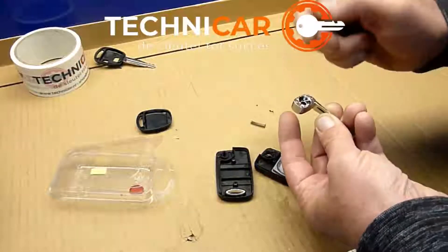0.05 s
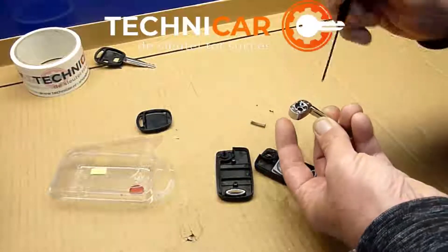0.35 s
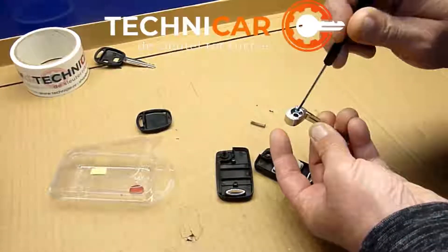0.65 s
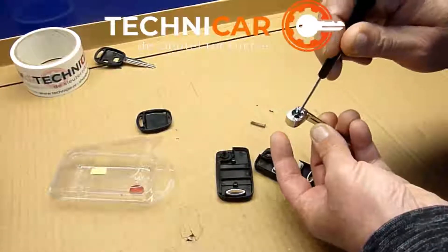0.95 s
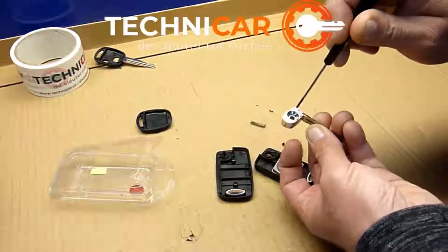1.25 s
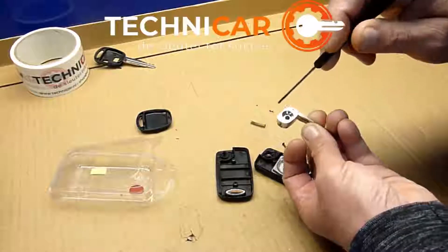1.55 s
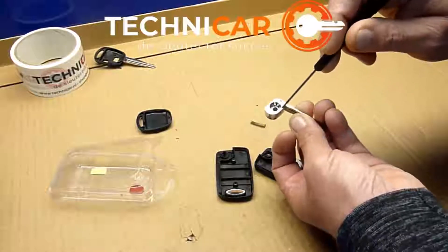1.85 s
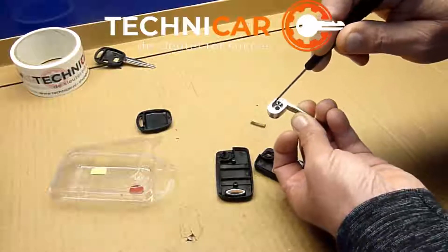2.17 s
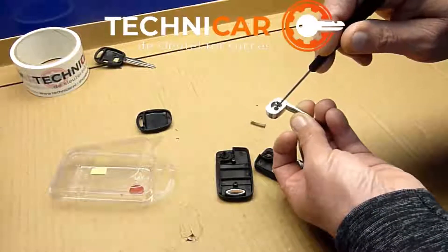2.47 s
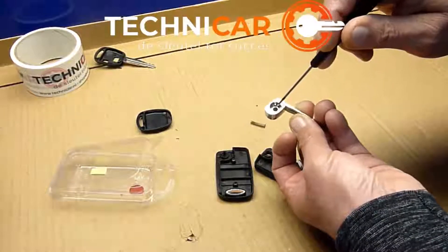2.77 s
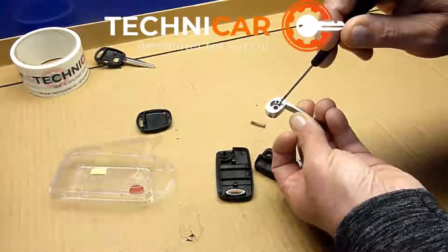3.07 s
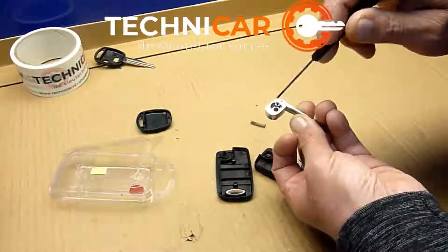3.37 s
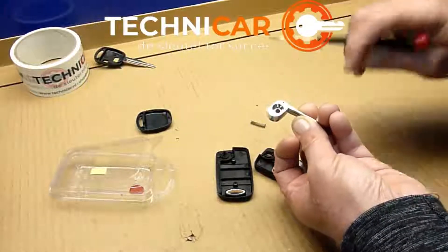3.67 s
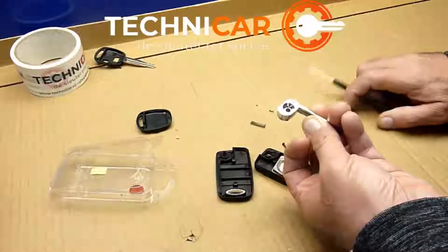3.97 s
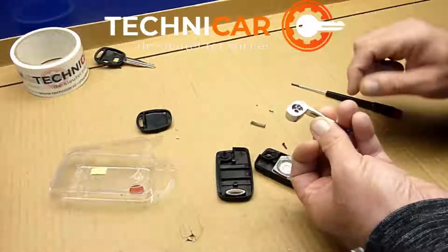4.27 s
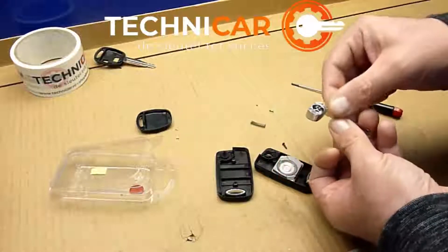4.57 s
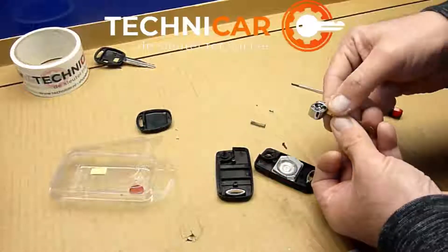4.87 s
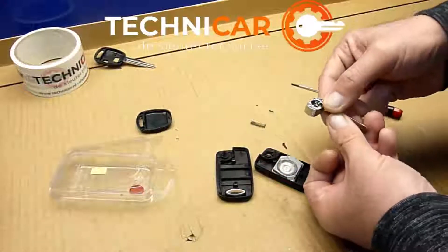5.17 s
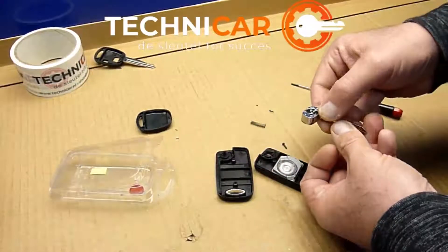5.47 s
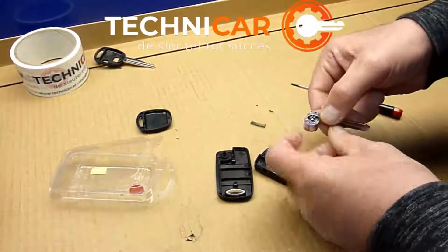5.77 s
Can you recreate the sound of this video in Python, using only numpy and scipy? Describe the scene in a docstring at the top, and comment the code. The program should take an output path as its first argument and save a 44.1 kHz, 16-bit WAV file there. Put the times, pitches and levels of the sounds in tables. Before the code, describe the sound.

Quiet room noise and a low hum run throughout, in a small room heard up close. Fingers rub softly on a tool at the very start. From about 0.7 to 0.9 seconds, a thin screwdriver tip makes five quick, bright clicks and a light scrape on a metal key head, each with a tiny, damped ring. Fainter ticks and a slight scratch follow around 1.9 to 2.2 seconds, then single ticks at 2.5, 2.9 and 3 seconds, slightly to the right. Fingers shift softly around 3.5 seconds. From 3.8 to 4.3 seconds the screwdriver is laid on the workbench and bounces in a rapid clatter of hollow knocks and steel slaps, by far the loudest sound, peaking at 4 seconds and dulling as it settles. A very faint electrical buzz comes briefly near 1, 3 and 5 seconds, and a faint thin whine pulses from 1.7 to 4.5 seconds.

```python
"""A thin screwdriver picks at the metal head of a flip key, over a workbench in a small room.
Its tip scrapes and ticks in the socket, making the head ring, while fingers rub on tool and key.
Then the tool is laid down: handle and steel end bounce to rest, and shaft and bench top ring.
Under it lie quiet room noise, a low hum and faint electrical interference that switches on and off."""
import sys
import numpy as np
from scipy import signal
from scipy.fft import rfft, irfft
from scipy.io import wavfile
from scipy.ndimage import uniform_filter1d

SR = 44100
rng = np.random.default_rng(int(sys.argv[2]) if len(sys.argv) > 2 else 0)


def wav_record(signal):
    """Record a signal, one row per channel, as 16-bit PCM in the file named by sys.argv[1]."""
    frames = np.transpose(np.atleast_2d(signal))
    bounded = np.clip(frames, -1, 1)
    # unit amplitude maps onto the largest positive 16-bit level
    quanta = np.round(bounded * 32767).astype(np.int16)
    wavfile.write(sys.argv[1], SR, quanta)


N = 256652
TIME = np.arange(N) / SR
EVENT_TIME = TIME[:SR // 3]  # seconds since the start of one tick, knock or scrape
FREQS = np.fft.rfftfreq(N, 1 / SR)

# How alike scattered sound is on the left and right (1 = the same): pitch_hz, likeness
STEREO_LIKENESS = [(100, 1), (600, 0.99), (1500, 0.98), (3200, 0.78), (7000, 0.4), (14000, 0.17)]


def amp(db):
    """Turns decibels into a gain to multiply by."""
    return 10 ** (np.asarray(db) / 20)


def unit_level(x):
    """Scales a signal to an average (rms) level of 1."""
    return x / np.sqrt(np.mean(x ** 2) + 1e-20)


def value_at(table, hz):
    """Reads between the rows of a table, with every octave equally wide."""
    pitches, values = np.transpose(table)
    return np.interp(np.log(hz + 1), np.log(pitches + 1), values)


def add(mix, start_s, sound):
    """Adds a sound to the mix at the given time."""
    part = mix[:, round(start_s * SR):][:, :sound.shape[-1]]
    part += sound[..., :part.shape[-1]]


def fade(t, fade_s):
    """Dies away by 60 dB in fade_s; any value below 1 ms counts as 1 ms."""
    return np.exp(-np.log(1000) * t / np.maximum(fade_s, 1e-3))


def colour(x, tone, tilt_db=0, peak_hz=0, peak_db=0, width_hz=260, size=2048):
    """Filters a sound by a tone table, a tilt per octave (plus is brighter) and one ringing peak."""
    hz = np.fft.rfftfreq(size, 1 / SR)
    db = value_at(tone, hz) + tilt_db * np.log2(np.maximum(hz, 500) / 5000)
    peak = abs(1 + (amp(peak_db) - 1) / (1 + 2j * (hz - peak_hz) / width_hz))
    gain = amp(db) * peak
    log_gain = np.log(np.r_[gain, gain[-2:0:-1]])
    taps = np.fft.ifft(np.exp(np.conj(signal.hilbert(log_gain)))).real  # rings only after a hit
    return signal.fftconvolve(x, taps[None], axes=1)[:, :x.shape[1]]


def stereo_noise(size, likeness=STEREO_LIKENESS):
    """White noise whose left and right are alike in the bass and less so in the treble."""
    same = np.clip(value_at(likeness, np.fft.rfftfreq(size, 1 / SR)), -.99, .99)
    mid, side = rfft(rng.standard_normal((2, size))) * np.sqrt([(1 + same) / 2, (1 - same) / 2])
    return irfft(np.array([mid + side, mid - side]), size)


def narrow_noise(hz, width_hz):
    """Noise in one narrow band of pitches."""
    band = np.exp(-((FREQS - hz) / width_hz) ** 2)
    return unit_level(irfft(rfft(rng.standard_normal(N)) * band, N))


def ring(notes, spread_db, detune):
    """A struck object rings at its own notes; each blow can shift their balance and pitch."""
    out = 0
    for hz, db, fade_s in notes:
        strength, shift, skew = rng.standard_normal(3)
        # high notes reach left and right out of step
        lag = np.arccos(np.clip(value_at(STEREO_LIKENESS, hz), -1, 1)) * skew * np.array([[.5], [-.5]])
        wave = np.sin(2 * np.pi * hz * (1 + detune * shift) * EVENT_TIME + lag)
        out = out + amp(db + spread_db * strength) * fade(EVENT_TIME, fade_s) * wave
    return out


def contact(chatter_db, chatter_s, touch_s, echo_s, echo_gain):
    """One hit: a brief push, its echo off the bench top, and a burst of chatter and near echoes."""
    burst = stereo_noise(len(EVENT_TIME)) * fade(EVENT_TIME, chatter_s)
    chatter = amp(chatter_db) * burst / np.sqrt(np.sum(burst ** 2) / 2)
    blow = np.zeros_like(burst)
    blow[:, 0] = -1
    delay = round(echo_s * SR)
    blow[[0, 1], [delay + 1, delay]] -= echo_gain  # the echo reaches the right side first
    push = np.exp(-((EVENT_TIME[:9] - EVENT_TIME[4]) / touch_s) ** 2)
    return signal.lfilter(push / push.sum(), [1], blow) + chatter


def friction(strokes, tone, grain_db):
    """Surfaces rub: each stroke is a swell of tiny slips of uneven size."""
    out = np.zeros((2, N))
    for start_s, rise_s, fade_s, db in strokes:
        roughness = unit_level(uniform_filter1d(rng.standard_normal(len(EVENT_TIME)), size=40))
        slips = unit_level(amp(grain_db * roughness))
        rise = np.sqrt(np.minimum(EVENT_TIME / rise_s, 1))
        swell = rise * fade(np.maximum(EVENT_TIME - rise_s, 0), fade_s)
        add(out, start_s, amp(db) * colour(stereo_noise(len(EVENT_TIME)) * slips * swell, tone))
    return out


def air(level_db=-58):
    """Room rumble and microphone hiss."""
    # Tone of the noise: pitch_hz, gain_db
    tone = [(15, -37), (25, -6), (58, 0.5), (84, -12.5), (99, -5), (120, -4), (153, -7), (270, -7.5),
            (301, -9), (439, -9.5), (796, -13), (1100, -14), (2350, -18.5), (14400, -28), (16000, -30.5)]
    # How alike its left and right are: pitch_hz, likeness
    likeness = [(60, 0.94), (130, 0.85), (290, 0.72), (640, 0.6), (1410, 0.0049), (3100, -0.063),
                (6820, -0.14), (15000, 0.4)]
    spectrum = rfft(stereo_noise(N, likeness)) * amp(value_at(tone, FREQS))
    return amp(level_db) * unit_level(irfft(spectrum, N))


def hum(waver_hz=1.22, waver_radians=.4):
    """Low steady tones whose pitch wavers slowly."""
    # Tones of the hum: pitch_hz, level_db
    tones = [(48.4, -74.5), (118.4, -73), (183.0, -73.5), (274.5, -77)]
    out = 0
    for hz, db in tones:
        drift = waver_radians * narrow_noise(0, waver_hz)
        out = out + amp(db) * np.sqrt(2) * np.sin(2 * np.pi * hz * TIME + drift)
    return out


def buzz(pitch_hz=362.3, hiss_db=-75, switch_s=.0051):
    """A faint electrical buzz with a sizzling top, switching on and off."""
    # When it sounds: on_s, off_s
    spans = [(.96, 1.33), (3.04, 3.41), (5.12, 5.46)]
    # Its tones at 1, 2, 3 ... times the pitch: level_db
    harmonics = [-70.5, -71.5, -76, -73, -89, -78, -79.5, -84, -84.5, -89, -87]
    # Its high, fuzzy bands: pitch_hz, level_db
    bands = [(11700, -87), (14250, -84), (14650, -85), (15500, -84)]
    gate = sum(np.clip(np.minimum(TIME - on, off - TIME) / switch_s, 0, 1) for on, off in spans)
    tone = sum(amp(db) * np.sqrt(2) * np.sin(2 * np.pi * (k * pitch_hz * TIME + rng.random()))
               for k, db in enumerate(harmonics, 1))
    sizzle = sum(amp(db) * narrow_noise(hz, width_hz=150) for hz, db in bands)
    return gate * (tone + sizzle + amp(hiss_db) * rng.standard_normal(N))


def whine(pitch_hz=3187, right_db=-69, on_s=1.74, off_s=4.47, every_s=.16, burst_s=.04):
    """A thin interference whine in short, evenly spaced bursts."""
    gate = (TIME > on_s) & (TIME < off_s) & ((TIME - on_s) % every_s < burst_s)
    soft_gate = uniform_filter1d(gate.astype(float), size=150)
    tone = np.sqrt(2) * soft_gate * np.sin(2 * np.pi * pitch_hz * TIME)
    return amp(right_db) * tone * np.array([[-.4], [1]])  # weaker and upside down on the left


def room(x, echo_db, build_s):
    """Adds the room's wash of echoes, which builds up briefly and dies sooner in the treble."""
    # How long the room rings: pitch_hz, fade_s
    fade_times = [(150, 0.43), (600, 0.24), (2000, 0.24), (5000, 0.21), (10000, 0.12), (16000, 0.068)]
    hz, t, bands = signal.stft(stereo_noise(SR), SR, nperseg=256)
    tail = signal.istft(bands * fade(t, value_at(fade_times, hz)[:, None]), SR)[1]
    tail *= np.minimum(TIME[:tail.shape[1]] / build_s, 1) ** 2
    tail /= np.linalg.norm(tail[0])
    return x + amp(echo_db) * signal.fftconvolve(x, tail, axes=1)[:, :N]


def bench_contact(chatter_db):
    """One hit of the tool on the bench top."""
    return contact(chatter_db, chatter_s=.031, touch_s=.000025, echo_s=.00094, echo_gain=.93)


def tool_landing(handle_hz=2000, bench_rise_s=.0025, lowest_hz=122):
    """The screwdriver bounces to rest, duller toward the end; its shaft and the bench top ring."""
    # The handle hits the bench: start_s, level_db, thump_gain_db
    knocks = [(3.8058, -9, 0.5), (3.8258, -10, 6.5), (3.925, -0.5, -1.5), (3.9976, 12.5, 2),
              (4.018, -3.5, -19), (4.035, -9.5, -5), (4.0758, 7, 4), (4.1208, -1, 6.5), (4.1453, -8.5, 14),
              (4.161, -15, 15.5), (4.2724, -33.5, 6)]
    # The steel end slaps down just after it: start_s, level_db, pitch_hz
    slaps = [(3.9266, -24, 7550), (4.0078, -16, 9460), (4.082, -23, 7200)]
    # Tone of a hit on the bench: pitch_hz, gain_db
    hit_tone = [(70, -53), (140, -21.5), (400, -9.5), (900, -4), (1600, -3.5), (2300, -3), (3300, 4),
                (5300, 2), (6700, -4), (8200, -5), (9700, -3), (12000, -10), (15500, -12)]
    # Brightness of the bounces: time_s, tilt_db_per_octave
    brightness = [(3.81, 0.5), (3.925, -0.5), (3.997, 0), (4.17, -4)]
    # The handle slides and rolls: start_s, rise_s, fade_s, level_db
    slides = [(3.82, .018, .2, -40), (4.09, .05, .1, -42)]
    # Tone of that sliding: pitch_hz, gain_db
    slide_tone = [(70, -40), (140, 11.5), (340, 10), (700, -9), (1500, -1.5), (2400, -8), (3100, 8.5),
                  (4200, 2.5), (9500, 6.5), (13000, -2.5), (16000, -9)]
    # Notes of the bench top: pitch_hz, level_db, fade_s
    bench_notes = [(132, -50, .14), (154, -43, .18), (190, -46, .08), (219, -42, .15), (243, -45, .11),
                   (333, -46, .09), (350, -46, .17), (500, -47, .08), (554, -44, .14), (770, -48, .12)]
    # Notes of the steel shaft: pitch_hz, level_db, fade_s
    shaft_notes = [(1266, -46.5, .12), (1520, -38, 0.029), (2090, -43.5, 0.06), (2590, -42.5, .08),
                   (3020, -40.5, .11), (3400, -44.5, 0.055), (4000, -44.5, 0.081), (4600, -47, .1),
                   (5160, -32.5, 0.031), (7260, -34, 0.046), (9680, -37, 0.071), (12100, -49, 0.065)]
    weak_to_hard_db = [.5, 9]
    out = friction(slides, slide_tone, grain_db=3)
    # the bench top takes a moment to move, and an arm resting on it damps it
    bench_swell = (1 - np.exp(-EVENT_TIME / bench_rise_s)) * fade(EVENT_TIME, fade_s=.25)
    for start_s, db, thump_db in knocks:
        tilt_db = np.interp(start_s, *np.transpose(brightness))
        # weak knocks chatter more and bring out the handle's hollow note
        chatter_db = np.interp(db, weak_to_hard_db, [10.5, 3.5])
        hollow_db = np.interp(db, weak_to_hard_db, [4.5, 3])
        crack = bench_contact(chatter_db) / np.hypot(1, amp(chatter_db))
        crack = colour(crack, hit_tone, tilt_db, handle_hz, hollow_db)
        bench = amp(thump_db) * bench_swell * ring(bench_notes, spread_db=2.5, detune=.0031)
        shaft = amp(-8) * ring(shaft_notes, spread_db=7.5, detune=.0052)
        add(out, start_s, amp(db) * (crack + bench + shaft))
    for start_s, db, hz in slaps:
        slap = colour(bench_contact(chatter_db=9), hit_tone, tilt_db=2, peak_hz=hz, peak_db=24)
        shaft = amp(-2) * ring(shaft_notes, spread_db=0, detune=.004)
        add(out, start_s, amp(db) * (slap + shaft))
    # the bench top gives off little sound below its lowest note
    return signal.sosfilt(signal.butter(6, lowest_hz, "high", fs=SR, output="sos"), out)


def head_note(x, boost_db, pitch_hz=2380, width_hz=92):
    """Turns the key head's lowest note up or down in the sound of a touch."""
    note = signal.lfilter(*signal.iirpeak(pitch_hz, pitch_hz / width_hz, fs=SR), x)
    return x + (amp(boost_db) - 1) * note


def tip_picking(chatter_db=4):
    """The tip slips and catches on the key head; fingers quickly damp the small metal part."""
    # The tip strikes the head: start_s, level_db, tilt_db_per_octave, head_note_boost_db
    ticks = [(0.6871, -20.5, 2, 7), (0.7146, -25, 5, 20), (0.7695, -18.5, 1, 0), (0.7982, -18, -0.5, -3),
             (0.8824, -20, 2.5, 13.5), (1.876, -41, -1.5, -5), (2.1425, -32, -0.5, 2), (2.164, -34, 1, -3),
             (2.1953, -36, -3, -1), (2.5203, -26.5, 4.5, 6), (2.8768, -28.5, 1.5, 8),
             (3.0424, -24.5, 0.5, 12.5)]
    # The tip slides in the socket: start_s, rise_s, fade_s, level_db
    scrapes = [(.707, 0.016, -0.08, -46), (.73, 0.027, 0.1, -57), (2.135, 0.042, 0.15, -63.5)]
    # Tone of the tip on the head: pitch_hz, gain_db
    tip_tone = [(200, 6), (800, -18), (1300, 4), (1800, -3), (2400, 6), (3100, 0), (3900, 4.5), (5500, 3),
                (6600, 5.5), (9500, 4.5), (12500, 6.5), (14800, 1), (16000, -15)]
    # Notes of the key head: pitch_hz, level_db, fade_s
    key_notes = [(2379, -32, .036), (3830, -31, .026), (6500, -34, .02), (8387, -29, .028),
                 (10710, -31, .025), (12450, -28, .02), (13700, -32, .02)]
    # Fingers shift on tool and key: start_s, rise_s, fade_s, level_db
    rubs = [(.075, .035, .12, -59), (3.45, .03, .15, -68), (3.638, .008, .12, -62)]
    # Tone of the fingers rubbing: pitch_hz, gain_db
    rub_tone = [(500, -24), (2000, -7), (3100, 7), (3800, 4), (4900, 13), (6000, -6), (7400, 4), (9000, -2),
                (16000, -2)]
    light_to_firm_db = [-22.5, -20.5]
    out = head_note(friction(scrapes, tip_tone, grain_db=-5), boost_db=8.5)
    out += friction(rubs, rub_tone, grain_db=3)
    for start_s, db, tilt_db, boost_db in ticks:
        # a light touch lets the tip sing high; pressing harder damps it and lowers its pitch
        sing_hz = np.interp(db, light_to_firm_db, [10040, 6600])
        sing_db = np.interp(db, light_to_firm_db, [10, 6])
        click = contact(chatter_db, chatter_s=.033, touch_s=.000012, echo_s=.0005, echo_gain=.4)
        ringing = amp(-1.5) * ring(key_notes, spread_db=5, detune=.005)
        tick = colour(head_note(click, boost_db) + ringing, tip_tone, tilt_db, sing_hz, sing_db)
        add(out, start_s, amp(db) / np.hypot(1, amp(chatter_db)) * tick)
    return out * amp([[-1.1], [.9]])  # a little to the right


def scene():
    """Key and tool in the room, over the quiet background."""
    picking = room(tip_picking(), echo_db=-15, build_s=.008)
    landing = room(tool_landing(), echo_db=-10, build_s=.0028)
    return picking + landing + air() + hum() + buzz() + whine()


def record(dry):
    """The microphone dips one narrow treble band, clips at full scale and cuts the highest treble."""
    dip_hz, dip_width_hz, dip_depth, top_hz = 7950, 180, .8, 15900
    dip = 1 - dip_depth * np.exp(-((FREQS - dip_hz) / dip_width_hz) ** 2)
    heard = np.clip(irfft(rfft(dry) * dip, N), -1, 1)
    low_pass = signal.firwin(511, top_hz, window=("kaiser", 9), fs=SR)
    return signal.oaconvolve(heard, low_pass[None], "same")


dry = scene()
out = record(dry)
wav_record(out)
```